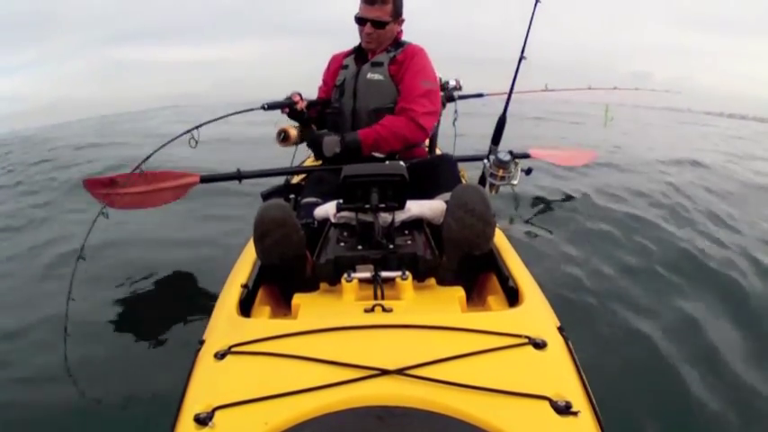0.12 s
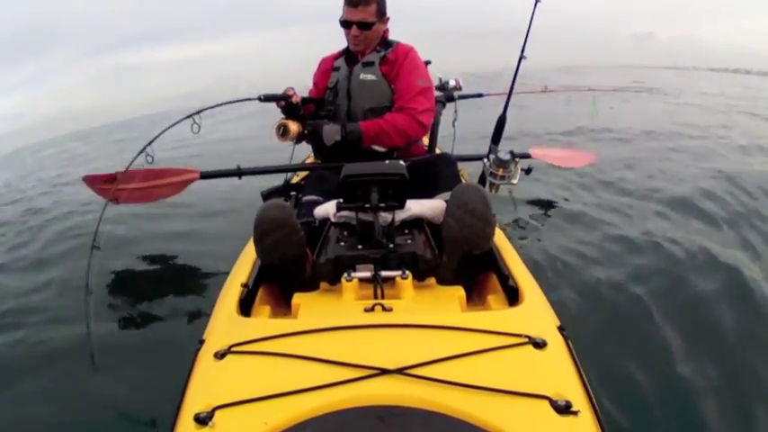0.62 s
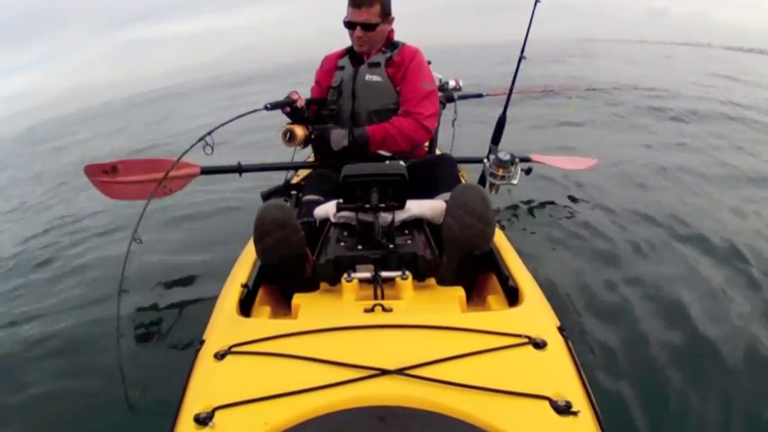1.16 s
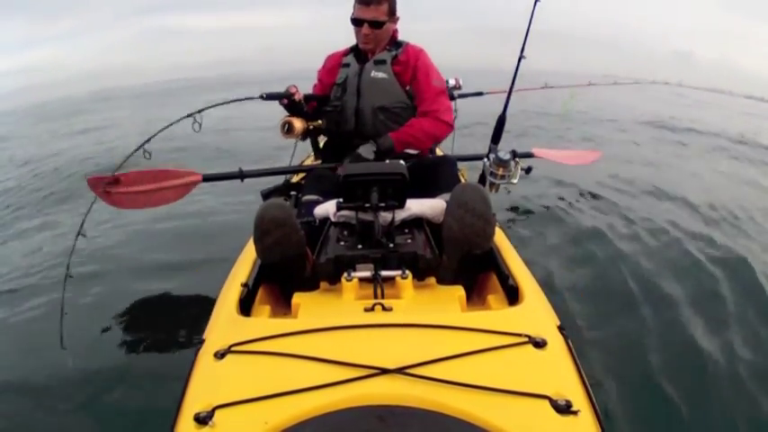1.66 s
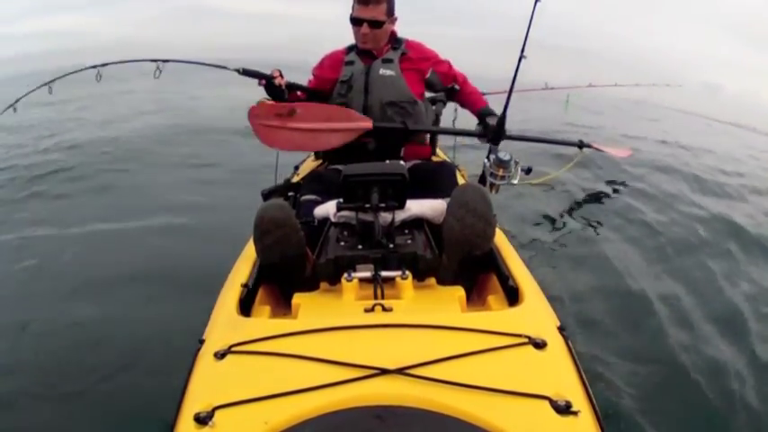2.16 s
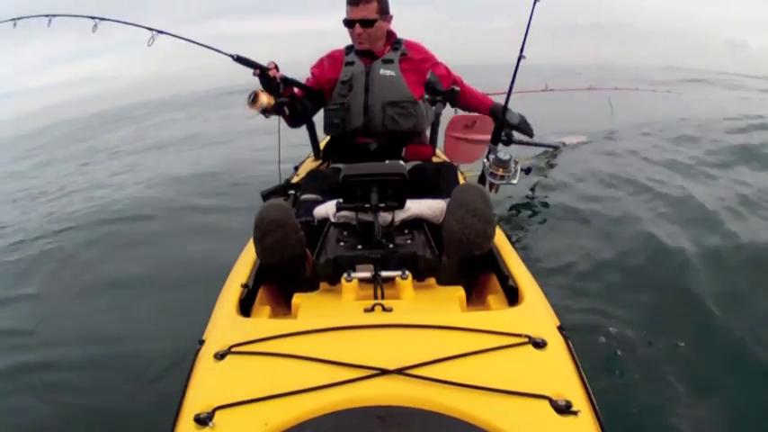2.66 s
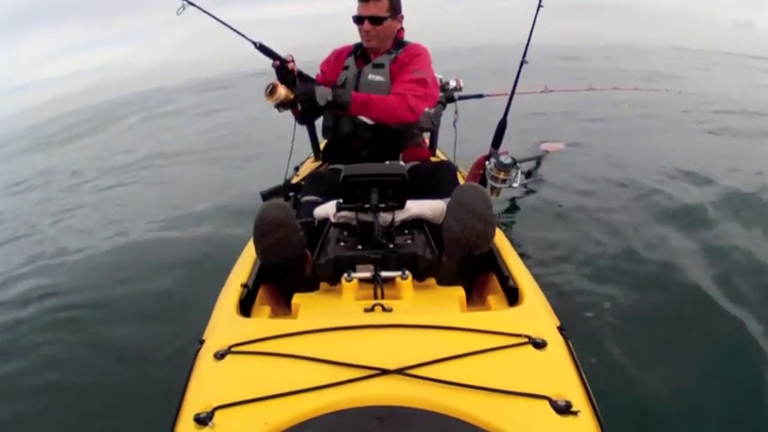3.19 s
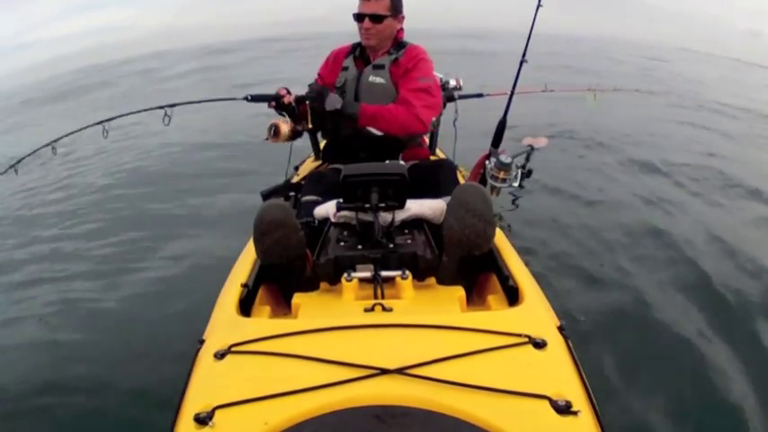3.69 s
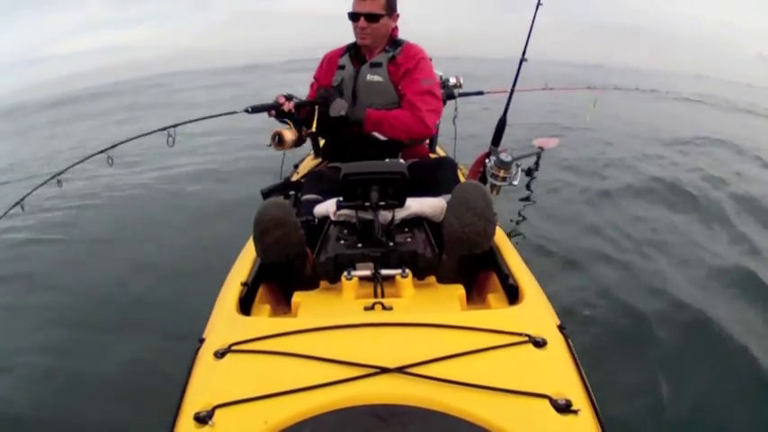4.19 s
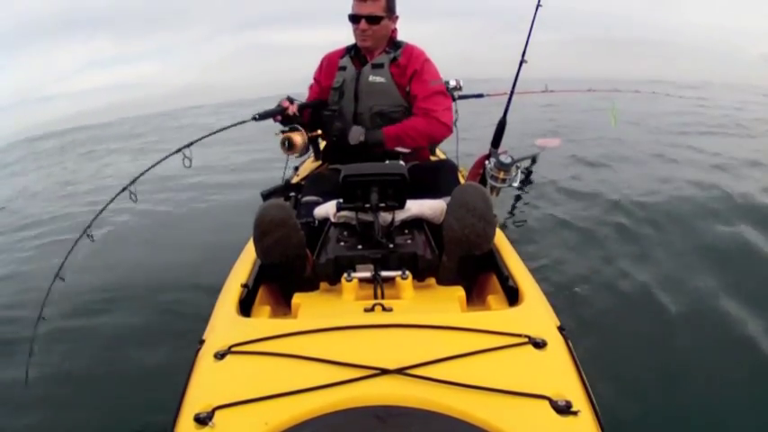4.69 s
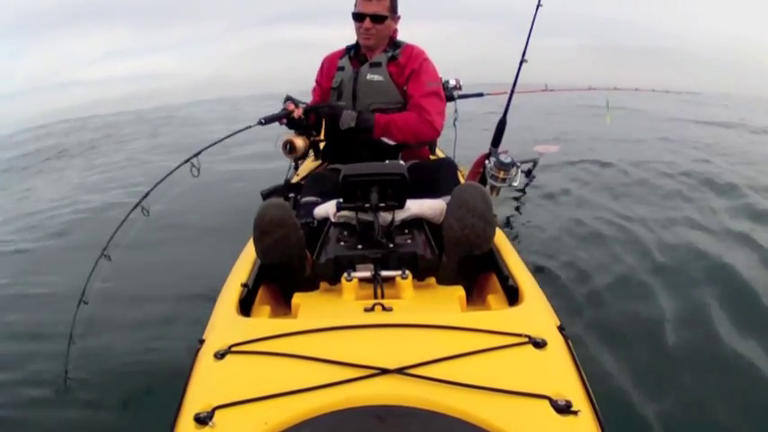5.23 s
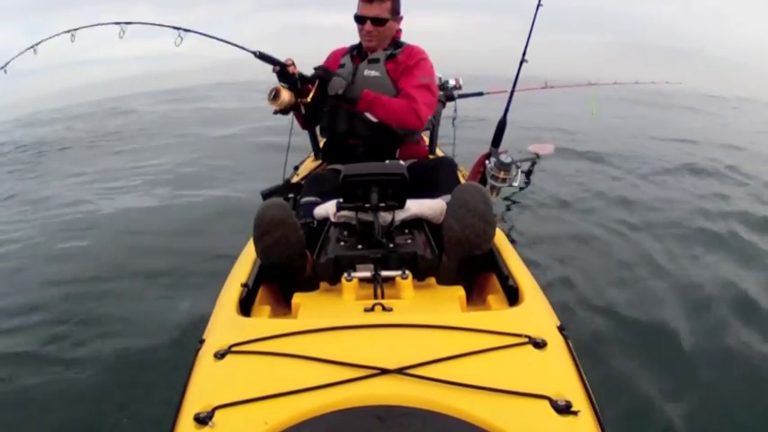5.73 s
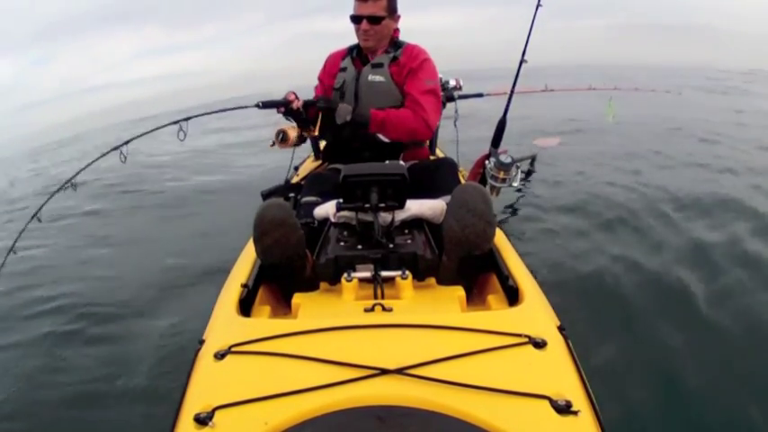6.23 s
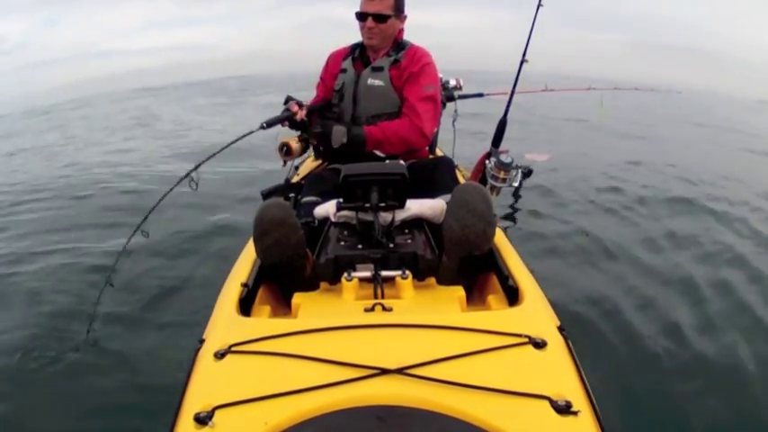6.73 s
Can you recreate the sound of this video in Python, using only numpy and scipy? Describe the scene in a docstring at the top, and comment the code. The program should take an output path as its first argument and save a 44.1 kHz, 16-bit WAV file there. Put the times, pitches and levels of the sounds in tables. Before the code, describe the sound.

A boxy, muffled microphone fixed to a plastic kayak on calm open water. The reel drag buzzes in quick clicks, soft taps build, water glugs briefly, then paddle and gear bang the hollow hull in an irregular flurry. Fine tackle ticks and cloth rustle continue with two more sharp knocks, thinning out to a last few clicks of drag.

```python
"""Paddle and tackle knock on the hollow hull of a plastic kayak, as an angler fights a fish on a calm sea:
bursts of noise ring the bands of the hull shell. Short gliding sines are air pockets gulping at the waterline
and the pitched body of some knocks. The reel's drag ratchets tooth by tooth through ringing spool modes, and
small tackle ticks in the case cavities. Behind lie surges, ripples, rustling wet cloth and line, a heaving hull
and a steady hiss. All is heard by a microphone in a sealed case on the bow."""
import sys
import numpy as np
from scipy import signal
from scipy.io import wavfile

SR = 44100
rng = np.random.default_rng(int(sys.argv[2]) if len(sys.argv) > 2 else 0)


def master(y):
    """Save y as 16-bit WAV."""
    cut = np.clip(np.atleast_2d(y).T, -1, 1)
    pcm = np.round(cut * 32767)  # scale
    wavfile.write(sys.argv[1], SR, pcm.astype(np.int16))


def ratio_of_db(decibels):
    """Turn decibels (scalar or array-like) into linear amplitude factors; 0 dB maps to 1."""
    return 10 ** (np.asarray(decibels, float) / 20)


N = 302957


def rms_one(x):
    """Scales to an rms of 1."""
    return x / np.sqrt(np.mean(x ** 2) + 1e-20)


def peak_one(x):
    """Scales to a peak of 1."""
    return x / (np.max(np.abs(x)) + 1e-20)


def add(out, start_s, x):
    """Mixes x into out from start_s on."""
    i = int(start_s * SR)
    out[i:i + len(x)] += x[:N - i]


def cut(x, hz, kind):
    """Steep low-pass or high-pass."""
    return signal.sosfilt(signal.butter(6, hz, kind, fs=SR, output="sos"), x)


def ring(drive, hz, t60):
    """A decaying mode: a unit click sets a sine of height 1 ringing."""
    r, w = ratio_of_db(-60 / (t60 * SR)), 2 * np.pi * hz / SR
    return signal.lfilter([0, np.sin(w)], [1, -2 * r * np.cos(w), r * r], drive + 1e-18)


def cavity(x, hz, width):
    """A resonance with gain 1 on top."""
    r = np.exp(-np.pi * width / SR)
    poles = [1, -2 * r * np.cos(2 * np.pi * hz / SR), r * r]
    return signal.lfilter([(1 - r * r) / 2, 0, (r * r - 1) / 2], poles, x)


def cavity_twice(x, hz, width):
    """Two passes of one resonance, for steeper flanks."""
    return cavity(cavity(x, hz, width), hz, width)


def drift(rate):
    """Slow random wander of spread 1: noise through two low-pass poles at rate, in Hz."""
    r = np.exp(-80 * np.pi * rate / SR)  # runs at SR / 40
    slow = signal.lfilter([1], [1, -2 * r, r * r], rng.standard_normal(N // 40 + 2002))[2000:]
    return np.interp(np.arange(N) / 40, np.arange(len(slow)), rms_one(slow))


def grit(per_s, spread_db, bed):
    """Random clicks of uneven size, in clumps, over smooth noise."""
    sizes = ratio_of_db(spread_db * np.minimum(rng.exponential(1, N), 5)) * rng.choice([-1, 1], N)
    born = rng.random(N) < per_s * ratio_of_db(5.0 * drift(9)) / SR
    return rms_one(sizes * born) + bed * rng.standard_normal(N)


def swells(rows, rise, fall):
    """Level in dB that climbs to each row's height, holds and sinks, at steady dB per s."""
    t = np.arange(N) / SR
    levels = []
    for start, held, db in rows:
        levels.append(db - rise * np.maximum(start - t, 0) - fall * np.maximum(t - start - held, 0))
    return np.max(levels, axis=0)


# Blows on the hull: t/s, peak level before the band cuts/dB, t60 of the shell at 1.1 kHz/s,
# hardness (tilt about 1.1 kHz)/dB per octave
BLOWS = [(0.943, -48, .3, 5), (0.967, -44, .006, 8), (0.99, -43, .08, 4), (1.155, -45, .006, -0.5),
         (1.202, -41, .1, 4), (1.224, -38, .05, -7), (1.353, -30, .04, 9), (1.443, -37, .03, 17),
         (1.506, -29, .015, 7), (1.654, -37.5, .035, 8), (1.763, -38.5, .1, 1.5), (2.105, -39, .008, 22),
         (2.44, -26.5, .006, 3), (2.467, -29, .01, 12), (2.482, -29, .06, 4.5), (2.51, -27.5, .006, 5),
         (2.602, -36.5, .006, 0), (2.66, -31, .04, 6), (2.751, -38, .006, 17), (2.907, -20, .035, 7),
         (2.953, -29.5, .025, 8), (3.023, -32.5, .05, -13), (3.039, -22.5, .025, -9),
         (3.072, -24.5, .03, -4), (3.084, -27, .03, 6), (3.126, -38, .006, 6), (3.196, -18.5, .03, -1),
         (3.215, -25, .06, -3), (3.261, -28, .006, 6), (3.423, -46.5, .006, 21.5),
         (3.584, -34.5, .006, 8.5), (4.124, -36, .04, 12), (4.142, -31, .02, 6), (4.17, -36, .03, 5),
         (4.496, -38, .02, 10), (4.506, -21, .012, 13), (4.512, -18, .05, -10), (4.89, -40, .04, 12),
         (4.916, -41, .02, 16), (5.023, -38, .02, 16), (5.167, -27.5, .012, 18), (5.173, -22, .006, 0),
         (5.183, -29, .012, 3), (5.345, -37, .03, 12), (5.657, -34, .07, -4), (6.148, -33, .02, 3),
         (6.598, -39, .02, 16), (6.653, -41, .006, 8), (6.785, -30, .04, -4), (6.799, -36, .006, 13),
         (6.849, -33.5, .006, 19)]


def knocks():
    """A blow fills the hull with ringing; bending waves carry the highs faster, and the highs die first."""
    out, t = np.zeros(N), np.arange(int(.2 * SR)) / SR
    for s, db, t60, hard_db in BLOWS:
        rough, drives = rng.standard_normal(len(t)), []
        for hz, _, _ in HULL_BANDS:
            age = np.maximum(t - 2.2 / hz, 0)  # lower bands arrive later
            life = t60 * (1100 / hz) ** 1.02
            skin = ratio_of_db(-60 * (age / life) ** 1.47)
            hollow = ratio_of_db(-14 - 60 * age / 0.12)  # the air inside keeps sounding
            drives.append(rough * (age > 0) * (skin + hollow))
        add(out, s - .002, ratio_of_db(db) * peak_one(shell(drives, hard_db)))
    return cut(cut(out, hz=244, kind="high"), hz=3520, kind="low")


# Crowded modes of the hull shell, as bands: f/Hz, width of the finished band/Hz, relative level/dB
HULL_BANDS = [(361, 137, -37), (611, 220, -15.5), (860, 96, -5), (1130, 257, -0.5), (1367, 340, -13.5),
              (1768, 170, -20), (2400, 260, -37), (3220, 150, -36)]


def shell(drives, hard_db):
    """Each hull band rings with its own drive; three passes keep its flanks steep and the valleys dark."""
    out = 0
    for (hz, width, db), band in zip(HULL_BANDS, drives):
        for _ in range(3):
            band = cavity(band, hz, 2 * width)  # three wide passes leave about one width
        out = out + ratio_of_db(db + hard_db * np.log2(hz / 1100)) * band
    return out


# Heavy blows that the whole hull answers: t/s, peak level of the boom before the low cut/dB
HEAVY_BLOWS = [(2.504, -61), (3.036, -46), (3.075, -51), (3.197, -43), (4.516, -51), (5.178, -60)]
# Low modes of the hull body: f/Hz, relative level/dB, t60 (a thud takes 0.7 of it)/s
BODY_MODES = [(56, -9, 0.26), (114, -3.5, 0.13), (147, -0.5, 0.073), (253, -5.5, 0.058)]


def thuds():
    """A heavy blow shakes the hull for some milliseconds and sets its low modes going."""
    out, t = np.zeros(N), np.arange(SR // 4) / SR
    for s, db in HEAVY_BLOWS:
        push = rng.standard_normal(len(t)) * ratio_of_db(-60 * t / .06)
        boom = sum(ratio_of_db(mode_db) * ring(push, hz, .7 * t60) for hz, mode_db, t60 in BODY_MODES[1:])
        shake = cut(push, hz=430, kind="low")
        add(out, s, ratio_of_db(db) * cut(peak_one(boom) + ratio_of_db(-5) * peak_one(shake), hz=104, kind="high"))
    return out


# Short gliding tones, air pockets gulping at the waterline and the pitched body of some knocks on the hull:
# t/s, level of the tone before its waver/dB, start f/Hz, f after one length/Hz,
# length (the tail runs on to 1.3 of it)/s
SHORT_TONES = [(0.486, -54, 2540, 2670, .013), (1.2, -38, 1310, 1000, .029), (1.212, -44, 1520, 1500, .022),
               (1.224, -41.5, 757, 830, .035), (1.352, -34, 1557, 1603, .025),
               (1.403, -39.5, 1130, 1270, .017), (1.482, -37.5, 1160, 1176, .024),
               (1.505, -38, 2150, 2240, .01), (1.545, -49, 2640, 3080, .013), (1.87, -21, 1230, 1250, .009),
               (1.891, -20, 1200, 1220, .006), (1.9, -19, 1230, 1200, .006), (1.906, -19, 1120, 1080, .007),
               (2.01, -54, 1950, 2050, .02), (2.107, -40, 1990, 2070, .01),
               (2.194, -30.5, 1077, 1035, .015), (2.21, -50.5, 995, 1014, .04),
               (2.439, -28, 1316, 1265, .025), (2.502, -8, 1108, 1134, .008), (2.599, -44, 715, 773, .036),
               (2.681, -38, 620, 1107, .032), (2.8, -46, 760, 1270, .034), (2.865, -49, 880, 960, .02),
               (3.021, -41, 590, 580, .04), (3.198, -25, 1000, 960, .018), (3.918, -47, 1050, 1600, .022),
               (4.514, -24, 1100, 880, .022), (4.565, -62.5, 635, 640, .19), (5.022, -35, 1180, 1230, .014),
               (5.174, -21, 1080, 1150, .007), (5.181, -21, 1150, 1250, .011),
               (5.431, -46.5, 1720, 1800, .0071), (5.659, -33, 930, 840, .025),
               (5.93, -64, 2800, 2900, .14), (5.995, -54, 1230, 1260, .04), (6.144, -36, 2500, 2670, .0087),
               (6.597, -41.5, 990, 996, .015), (6.661, -46, 800, 1230, .062),
               (6.739, -47.5, 1070, 1110, .02), (6.783, -36.5, 1900, 1900, .01)]
SWELL_S, SWELL_S_PER_OCTAVE = .0025, .024  # a tone that glides up also swells for longer
WAVER_DB, WAVER_HZ = 1.6, 120  # the tone is unsteady


def gliding_tones():
    """A short sine swells, glides in pitch and dies, with a snap of noise at its start."""
    out = np.zeros(N)
    for s, db, from_hz, to_hz, length in SHORT_TONES:
        octaves_up = max(np.log2(to_hz / from_hz), 0)
        swell = min((SWELL_S + SWELL_S_PER_OCTAVE * octaves_up) / length, .7)  # share of the length
        u = np.arange(int(1.3 * length * SR)) / (length * SR)
        attack = np.sin(np.pi / 2 * u / swell) ** 2
        decay = ratio_of_db(-16 * ((u - swell) / (1.01 - swell)) ** 2)
        glide = from_hz + (to_hz - from_hz) * u
        tone = np.where(u < swell, attack, decay) * np.sin(2 * np.pi * np.cumsum(glide) / SR)
        waver = rms_one(cavity_twice(rng.standard_normal(len(u)), WAVER_HZ, WAVER_HZ))
        tone = tone * ratio_of_db(WAVER_DB * waver)
        # the snap is weaker when the swell takes a larger share
        snap = rng.standard_normal(len(u)) * ratio_of_db(-60 * u * length / .012)
        snap = cut(cavity(snap, 1.3 * from_hz, 1.5 * from_hz), hz=2.2 * from_hz, kind="low")
        add(out, s, ratio_of_db(db) * (tone + ratio_of_db(-7 - 40.0 * swell) * peak_one(snap)))
    return cut(out, hz=260, kind="high")


# The reel's drag slips twice, one table a slip: t/s, rate/teeth per s,
# peak level of a tooth's spool ring before its random spread/dB
DRAG_SLIPS = [
    [(0.003, 55, -38), (0.085, 60, -38), (0.13, 92, -38), (0.225, 93, -35.5), (0.282, 55, -35)],
    [(6.822, 45, -45), (6.868, 45, -39)],
]
TOOTH_WOBBLE, TOOTH_SPREAD_DB = .04, 1.7  # spread in shares of a tooth's spacing, and in dB


def teeth():
    """A tooth passes whenever the turning spool has moved on one spacing; none is quite even."""
    rows = []
    for slip in DRAG_SLIPS:
        s, per_s, db = np.transpose(slip)
        t = np.arange(s[0], s[-1], 1 / SR)
        passed = np.cumsum(np.interp(t, s, per_s)) / SR
        marks = np.arange(.5, passed[-1])
        wobble, luck_db = rng.standard_normal((2, len(marks)))
        when = np.interp(marks + TOOTH_WOBBLE * wobble, passed, t)
        tooth_db = np.interp(when, s, db) + TOOTH_SPREAD_DB * luck_db
        rows += zip(when, tooth_db, np.interp(when, s, per_s))
    return rows


# Modes of the spool: f at 70 teeth per s/Hz, relative level before a random spread/dB, t60/s
SPOOL_MODES = [(2280, -21, 0.06), (3110, 3.5, 0.03), (3340, -9, 0.04), (5150, -26, .045), (7500, -4, 0.012)]
TOOTH_SLIDE_S, SPOOL_BEND = .0026, .04  # scrape up a tooth; pitch share per octave of tooth rate


def reel():
    """Each tooth scrapes a spring into the spool's modes, higher when line runs fast, and rattles the case."""
    out, t = np.zeros(N), np.arange(SR // 3) / SR
    for s, db, per_s in teeth():
        slide = t / TOOTH_SLIDE_S
        snap = rng.standard_normal(len(t)) * slide * np.exp(-slide ** 2)
        bend = 1 + SPOOL_BEND * np.log2(per_s / 70) + 0.007 * rng.standard_normal()
        spool = ratio_of_db(-28) * ring(snap, 3316, 0.7)  # the metal frame rings on
        for hz, mode_db, t60 in SPOOL_MODES:
            spool = spool + ratio_of_db(mode_db + rng.normal(0, 2.5)) * ring(snap, hz * bend, t60)
        spool -= .6 * cavity(spool, 4200, 1200)  # the case is deaf between its cavities
        spool = peak_one(cut(spool, hz=1900, kind="high"))
        chatter = rng.standard_normal(len(t)) * ratio_of_db(-60 * t / 0.02)
        rattle = peak_one(high_cavities(chatter))
        add(out, s - .001, ratio_of_db(db) * (spool + ratio_of_db(-4) * rattle))
    return out


# Hard small ticks of tackle: t/s, peak level of the treble/dB, 3 kHz cavity against the treble/dB
HARD_TICKS = [(0.9627, -49, -6), (1.4452, -48, 0), (2.44, -20, 6), (2.4826, -40, -6), (2.59, -42, -10),
              (2.6289, -44, 5), (2.6615, -43.5, 0), (2.7553, -36.5, -1.5), (2.9062, -23.5, -2),
              (2.9553, -38.5, -4), (2.9892, -37.5, -6.5), (3.4951, -46, -10), (3.5595, -38.5, -12),
              (3.6382, -45, -12), (3.8051, -42.5, -7.5), (3.9223, -44, -5), (3.9365, -42, -19),
              (3.9962, -42.5, -25), (4.0837, -35.5, -22), (4.1933, -35.5, -14), (4.233, -44.5, -11),
              (4.3392, -49, -11), (4.4343, -44.5, -22), (4.4489, -39.5, -29), (4.504, -41, 3),
              (4.5776, -40, -14), (4.612, -44, -5.5), (4.6676, -46, -23), (4.748, -41.5, -24),
              (4.82, -40.5, -29), (4.848, -46, -18), (4.865, -41.5, -12), (5.1708, -43.5, 3),
              (5.323, -43, -19), (6.664, -47, -10), (6.7314, -44, -24), (6.7646, -41.5, -10),
              (6.805, -44, 0), (6.833, -42, -4)]


def ticks():
    """A short crack of noise sets the case cavities ringing, the lowest at its own level."""
    out, t = np.zeros(N), np.arange(SR // 25) / SR
    for s, db, low_db in HARD_TICKS:
        crack = rng.standard_normal(len(t)) * (ratio_of_db(-60 * t / 0.015) + ratio_of_db(-27.5 - 60 * t / 0.072))
        lean_db = 0.8 * (low_db + 9)  # per octave: a duller tick favours the lower cavities
        high = 0
        for hz, width, level_db in CAVITIES[1:]:
            lean = ratio_of_db(level_db - lean_db * np.log2(hz / 14000))
            high = high + lean * cavity_twice(crack, hz, 1.6 * width)  # two passes leave about one width
        low = low_cavity(cavity(crack, 2500, 1500))
        add(out, s, ratio_of_db(db) * (peak_one(high) + ratio_of_db(low_db) * peak_one(low)))
    return out


# Dull taps of tackle: t/s, peak level/dB
DULL_TAPS = [(2.154, -40.5), (2.4972, -33.5), (2.605, -45), (2.6209, -40), (2.6928, -38), (2.7267, -43),
             (2.7511, -38.5), (2.9078, -22.5), (3.054, -35), (3.1258, -40.5), (3.26, -40), (3.4152, -47),
             (3.477, -44), (3.5508, -52), (3.6012, -45.5), (3.8546, -44.5), (3.8896, -45), (3.9245, -43),
             (4.418, -49), (4.43, -49), (4.4728, -47), (4.486, -47), (4.5067, -29.5), (5.1711, -44),
             (5.4475, -50), (6.1454, -45), (6.4931, -41), (6.5725, -45), (6.5974, -44), (6.6144, -45)]


def taps():
    """A dull tap is a short burst of noise that reaches the lowest case cavity only."""
    out, t = np.zeros(N), np.arange(SR // 25) / SR
    for s, db in DULL_TAPS:
        crack = rng.standard_normal(len(t)) * ratio_of_db(-60 * t / 0.01)
        add(out, s, ratio_of_db(db) * peak_one(low_cavity(cavity(crack, 3200, 800))))
    return out


# Cavities of the case: f/Hz, width/Hz, relative level (of all but the first)/dB
CAVITIES = [(3237, 310, 0), (5150, 630, -7), (7580, 1400, -1.5), (12400, 880, -20.5), (13950, 1900, 11)]


def high_cavities(x):
    """The case's upper cavities resonate side by side."""
    return sum(ratio_of_db(level_db) * cavity(x, hz, width) for hz, width, level_db in CAVITIES[1:])


def low_cavity(x):
    """The lowest case cavity resonates, with little above it."""
    hz, width, _ = CAVITIES[0]
    return cut(cavity(x, hz, width), hz=3750, kind="low")


# Surges of water: start t/s, held time/s, rms level of the shell before its throbbing/dB
WATER_SURGES = [(1.858, .09, -30.5), (5.688, .03, -48)]


def gushes():
    """A surge of water throbs unevenly against the shell."""
    level_db = swells(WATER_SURGES, rise=750, fall=600)
    surge = rng.standard_normal(N) * ratio_of_db(2.4 * drift(74))
    struck = cavity(shell([surge] * len(HULL_BANDS), hard_db=-6.5), 1150, 2000)
    struck = rms_one(cut(struck, hz=3400, kind="low"))
    spray = ratio_of_db(-38) * rng.standard_normal(N)
    rumble = ratio_of_db(-26) * rms_one(cavity_twice(surge, 300, 300))
    return ratio_of_db(level_db) * (struck + spray + rumble)


# What stirs: t/s, level of the ripples' wash/dB, level of the rustle of cloth and line/dB
STIRRING = [(0.0, -66, -62), (0.3, -67, -70), (0.48, -78, -81), (1.23, -74, -80), (1.4, -58, -72),
            (1.62, -59, -63), (1.9, -55, -64), (2.2, -69, -76), (2.48, -74, -77), (2.6, -57, -63),
            (2.93, -59, -60.5), (3.12, -44, -55), (3.25, -59, -68), (3.45, -61, -68), (4.07, -60, -64),
            (4.2, -58, -59), (4.42, -62, -68), (4.6, -61, -62), (4.78, -63, -69), (4.9, -59, -61),
            (5.13, -66, -75), (5.6, -65, -75), (5.81, -66, -67), (6.2, -67, -72), (6.58, -67, -75),
            (6.87, -62, -62)]


def stir_levels():
    """Wash and rustle levels in dB, in straight lines from point to point."""
    s, wash_db, rustle_db = np.transpose(STIRRING)
    t = np.arange(N) / SR
    return np.interp(t, s, wash_db), np.interp(t, s, rustle_db)


def ripples(wash_db):
    """Ripples patter on the hull: clumped clicks over noise drive every band of the shell."""
    patter = grit(260, spread_db=4.2, bed=0.82)
    return ratio_of_db(wash_db) * rms_one(shell([patter] * len(HULL_BANDS), hard_db=-5.0))


def rustle(rustle_db):
    """The angler's cloth and line scratch in the lowest case cavity."""
    scratch = grit(500, spread_db=3.0, bed=0.43)
    hz, width, _ = CAVITIES[0]
    body = cavity(scratch, hz, width) + ratio_of_db(-3) * cavity(scratch, 2380, 1240)
    return ratio_of_db(rustle_db) * rms_one(cut(body, hz=3610, kind="low"))


def crackle(rustle_db):
    """The rustle's treble crackles in the upper cavities, louder where the tackle ticks often."""
    t = np.arange(N) / SR
    near = sum(np.exp(-((t - s) / .15) ** 2) for s, _, _ in HARD_TICKS)
    ticks_per_s = near / (.15 * np.sqrt(np.pi))
    # follows .55 of the rustle's swing, and .28 dB more for each tick per s
    treble_db = -73.5 + .55 * (rustle_db - rustle_db.mean()) + .28 * ticks_per_s
    clicks = grit(220, spread_db=4.0, bed=0.5) * ratio_of_db(1.5 * drift(5))
    return ratio_of_db(treble_db) * rms_one(high_cavities(clicks))


# The hull heaves: start t/s, held time/s, level/dB
HULL_HEAVES = [(1.9, .05, -65), (2.97, .33, -60.5), (5.72, .1, -76)]


def heave():
    """The hull heaves in the swell: unsteady noise keeps its low modes ringing."""
    level_db = np.maximum(swells(HULL_HEAVES, rise=250, fall=80), -87)  # never below the calm level
    swell = rng.standard_normal(N) * ratio_of_db(4.9 * drift(8))
    modes = sum(ratio_of_db(mode_db) * ring(swell, hz, t60) for hz, mode_db, t60 in BODY_MODES)
    return ratio_of_db(level_db) * rms_one(cut(modes, hz=53.6, kind="high"))


# Spectrum of the steady floor: f/Hz, relative level per Hz/dB
FLOOR = [(24, -21), (388, -5), (1240, 0), (1530, -7), (2340, -7), (3380, -12), (4290, -14.5), (8530, -23.5),
         (11100, -23.5), (15200, -21), (16500, -22)]


def hiss():
    """Far sea and the microphone's own noise, in third-octave bands."""
    out, edges = 0, 25 * 2 ** np.arange(0, 9.7, 1 / 3)
    white = rng.standard_normal((2, N))  # neighbouring bands take turns, so they stay independent
    hz, db = np.transpose(FLOOR)
    for k, (low, high) in enumerate(zip(edges, edges[1:])):
        band = signal.sosfilt(signal.butter(2, [low, high], "band", fs=SR, output="sos"), white[k % 2])
        middle = np.log(low * high) / 2
        out = out + ratio_of_db(np.interp(middle, np.log(hz), db)) * band
    return ratio_of_db(-65.5) * rms_one(out)


def scene():
    """Blows, gliding tones, reel and tackle over a steady background that stops at 16 kHz."""
    wash_db, rustle_db = stir_levels()
    stirring = ripples(wash_db) + rustle(rustle_db) + crackle(rustle_db) + heave()
    top = signal.cheby2(16, 40, 16030, fs=SR, output="sos")
    steady = signal.sosfilt(top, stirring + hiss() + gushes())
    return (knocks() + thuds() + gliding_tones() + reel() + ticks() + taps() + steady)[None]


def low_pass(x):
    """Removes everything above the highest recorded frequency."""
    return signal.sosfilt(signal.butter(12, 17010, fs=SR, output="sos"), x)


def record(dry):
    """A steep low-pass takes off the top from 17 kHz."""
    top = signal.cheby2(10, 50, 17000, fs=SR, output="sos")
    return low_pass(signal.sosfilt(top, dry))


dry = scene()
out = record(dry)
master(out)
```